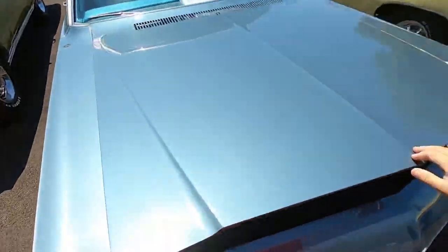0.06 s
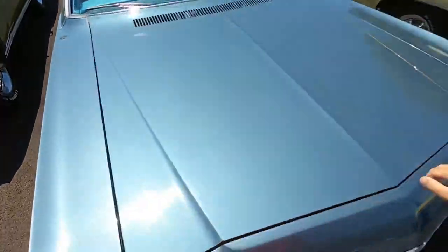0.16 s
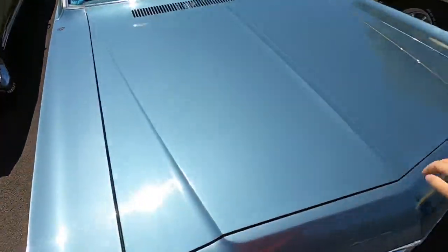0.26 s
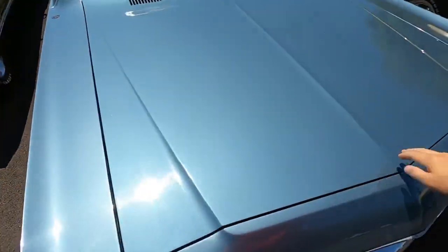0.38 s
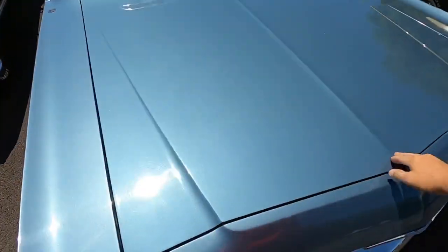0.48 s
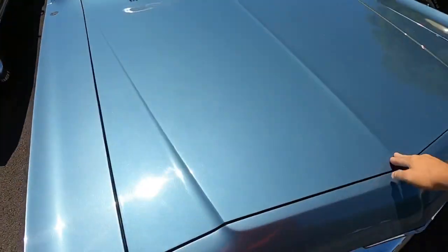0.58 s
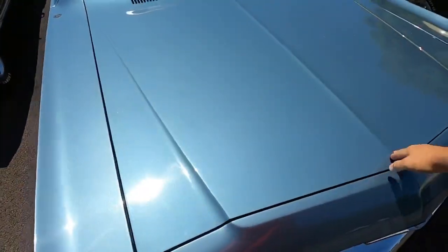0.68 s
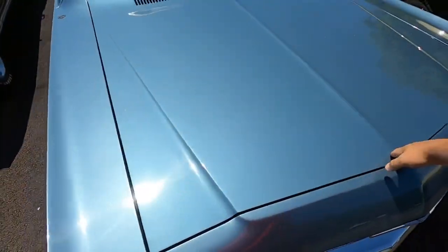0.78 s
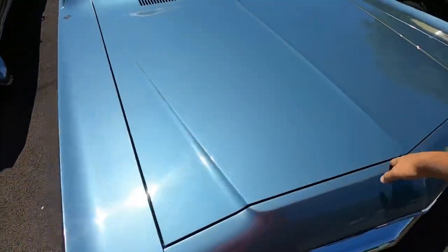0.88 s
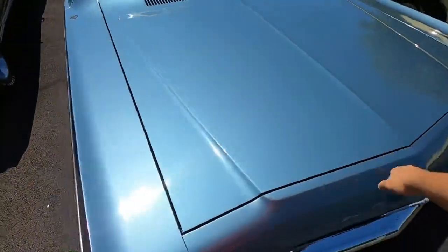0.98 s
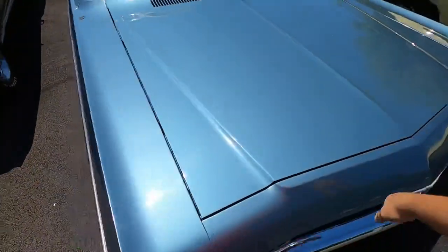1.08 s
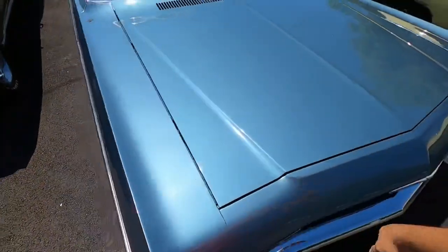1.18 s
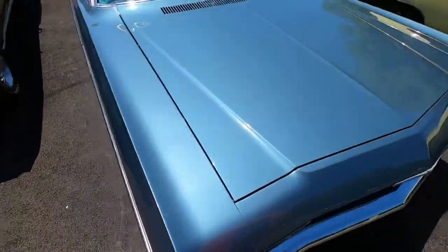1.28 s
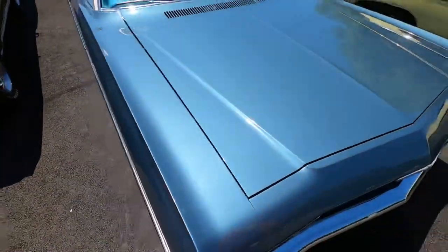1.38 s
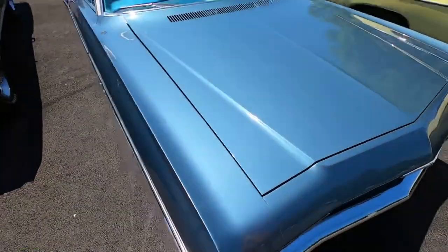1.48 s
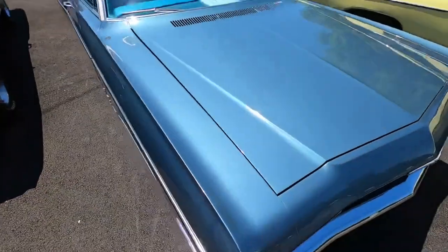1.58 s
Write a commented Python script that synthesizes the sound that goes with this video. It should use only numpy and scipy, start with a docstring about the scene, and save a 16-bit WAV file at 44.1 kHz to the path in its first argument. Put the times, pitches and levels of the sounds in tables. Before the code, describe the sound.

A heavy steel car hood slams shut with one sharp, booming bang outdoors over faint traffic rumble

```python
"""Far traffic, made of banded noise with engine drones, rumbles throughout; two noise puffs of air come first.
At 0.2 s a heavy steel car hood slams outdoors, an arm's length away and a little to the right: within 60 ms
the striker hits the latch, the latch snaps and catches, and the hood lands on its stops. Noise makes the sheet,
decaying sines the panel and latch. A noise zing, the after-ring of body and yard, a dull echo and a tick follow.
One more puff comes at about 0.97 s, and near the end a thin, far squeal from a wavering sine."""
import sys
import numpy as np
from scipy import signal
from scipy.fft import rfft, irfft
from scipy.io import wavfile

SR = 44100
rng = np.random.default_rng(int(sys.argv[2]) if len(sys.argv) > 2 else 0)


def generate_wav(signal):
    """Clip the signal to [-1, 1] and save it as 16-bit WAV at the path in sys.argv[1]."""
    frames = np.transpose(np.atleast_2d(signal))
    scaled = np.clip(frames, -1, 1) * 32767
    pcm = np.round(scaled).astype(np.int16)
    wavfile.write(sys.argv[1], SR, pcm)


N = 70560
T = np.arange(N) / SR
FREQS = np.maximum(np.arange(N // 2 + 1) * SR / N, 1)


def undb(db):
    """Decibels to gain."""
    return 10 ** (np.asarray(db) / 20)


def unit(x):
    """Scale to rms 1."""
    return x / np.sqrt(np.mean(x ** 2))


def at(table, hz, axis=1):
    """Read a column of a table along log frequency."""
    table = np.array(table, float)
    return np.interp(np.log(hz), np.log(table[:, 0]), table[:, axis])


def pan(db):
    """Left and right gains for a left-minus-right level difference; their mean is 1."""
    ratio = undb(np.atleast_1d(db))
    return 2 * np.array([ratio, np.ones_like(ratio)]) / (1 + ratio)


def flat(count):
    """Even spectra with random phases."""
    return np.exp(2j * np.pi * rng.random((count, len(FREQS))))


def stereo_noise(colour, image):
    """Spectrum of a coloured noise, partly shared between the ears."""
    likeness = np.clip(at(image, FREQS, axis=2), 0, 1)
    noise = flat(count=3)
    shared = np.sqrt(likeness) * noise[0]
    separate = np.sqrt(1 - likeness) * noise[1:]
    return (shared + separate) * pan(at(image, FREQS)) * undb(at(colour, FREQS))


def narrow_noise(hz, width_hz):
    """Noise of rms 1 in one steep resonance, as wide as given at half amplitude."""
    resonance = 1 / (1 + ((FREQS - hz) / width_hz * 2) ** 4)
    return unit(irfft(flat(count=1)[0] * resonance, N))


def three_ways(spectrum, low_hz, high_hz):
    """Split a stereo spectrum into bass, middle and treble, the mono sum of each at one level."""
    low, below = (1 / (1 + (FREQS / hz) ** 6) for hz in (low_hz, high_hz))
    bands = [spectrum * weight for weight in (low, below - low, 1 - below)]
    return [band / np.std(irfft(band, N).mean(axis=0)) for band in bands]


def uneven(spacing_hz, spread_db):
    """Random peaks and dips along frequency."""
    grid = np.cumsum(rng.uniform(.5, 1.5, 2048)) * spacing_hz
    return undb(spread_db * np.interp(FREQS, grid, rng.standard_normal(len(grid))))


def strike(start, rise, t60):
    """Envelope: a straight rise, then an exponential fall."""
    age = np.maximum(T - start, 0)
    fall = np.exp(-np.log(1000) * np.maximum(age - rise, 0) / t60)
    return np.minimum(age / rise, 1) * fall


def ring_out(spectrum, start, rise, t60s):
    """Dense modes that start together and die at the pace of their band."""
    place = np.interp(np.log(FREQS), np.log([hz for hz, _ in t60s]), np.arange(len(t60s)))
    ring = 0
    for k, (_, t60) in enumerate(t60s):
        band = np.maximum(1 - abs(place - k), 0)  # neighbouring bands crossfade
        ring = ring + irfft(spectrum * band, N) * strike(start, rise, t60)
    return ring


def modes(table, start, push):
    """Separate decaying sine modes set off by one push."""
    return sum(undb(db) * np.sin(2 * np.pi * hz * (T - start)) * strike(start, push, t60)
               for hz, db, t60 in table)


# contacts of the closing hood: t/s, rise t/s, then level/dB of thump, clang, treble, panel modes, latch ring
CONTACTS = [(0.2018, 0.00031, -18.5, -19, -26.5, -5.5, -2.5), (0.2191, .002, -17.5, -20, -25, -3, -11),
            (0.2430, 0.0027, -12, -27.5, -28.5, -1.5, -8.5), (0.2610, 0.0023, -14.5, -18, -36.5, -4.5, -31)]


def hood():
    """Each contact shakes the sheet steel, the panel modes and the latch."""
    slam, peaks = 0, sheet_peaks()
    for start, rise, thump_db, clang_db, treble_db, panel_db, latch_db in CONTACTS:
        slam = slam + sheet_steel(start, rise, (thump_db, clang_db, treble_db), peaks)
        slam = slam + panel(start, panel_db) + latch(start, latch_db)
    return slam


def sheet_peaks():
    """The sheet's modes bunch into uneven peaks, growing to full height at the top panel mode."""
    peaks = uneven(spacing_hz=70.9, spread_db=2)
    return peaks ** np.minimum(FREQS / PANEL[-1][0], 1)


# colour of the struck sheet, before its bands are levelled: f/Hz, level/dB per Hz
STEEL = [(18, -38), (30, -11), (105, -1), (192, -7), (277, -7), (410, -15), (622, -12), (897, -21.5),
         (1050, -20.5), (2130, -20.5), (2360, -23.5), (3780, -23), (4090, -33), (7650, -41.5),
         (8950, -43.5), (15500, -65.5)]
# ring time of its dense modes: f/Hz, t60/s
STEEL_T60 = [(60, .14), (300, 0.27), (1000, 0.25), (2500, .18), (6000, .16), (13000, 0.11)]
# stereo place of sheet and panel: f/Hz, left-minus-right level/dB, likeness of the ears 0-1
STEEL_IMAGE = [(148, -0.5, 0.92), (390, -1, 0.97), (840, -12.5, 0.69), (2370, -3, 0.63), (4760, -4.5, 0),
               (6430, -11, 0.02), (8750, -16, 0.02), (15000, -28, 0.2)]
THUMP_TOP_HZ, TREBLE_FROM_HZ = 555, 4320


def sheet_steel(start, rise, levels_db, peaks):
    """Struck sheet steel has modes too dense to tell apart: decaying noise in three bands."""
    bands = three_ways(peaks * stereo_noise(STEEL, STEEL_IMAGE), THUMP_TOP_HZ, TREBLE_FROM_HZ)
    sheet = sum(undb(db) * band for db, band in zip(levels_db, bands))
    return ring_out(sheet, start, rise, STEEL_T60)


# boom of the hood panel, mode by mode: f/Hz, relative level/dB, t60/s
PANEL = [(69, 3.5, 0.19), (83, -3.5, 0.17), (112.7, 1, 0.81), (138.2, 5, 0.4), (181.4, 0, 1),
         (256.3, -2.5, 0.54), (292, -5, 0.73), (361.5, -3.5, 0.65), (467.7, -9.5, 0.72),
         (510.5, -7.5, 0.42), (623, -16, 0.61), (670, -19, 0.18), (843, -20.5, 0.66), (1061, -15, 0.51),
         (1172, -21.5, 0.7), (1280, -26.5, 0.77)]
PANEL_DB, PANEL_PUSH_S = -18.5, 0.0041


def panel(start, level_db):
    """The big panel booms in separate sine modes, placed like the sheet."""
    boom = rfft(modes(PANEL, start, PANEL_PUSH_S)) * pan(at(STEEL_IMAGE, FREQS))
    return undb(PANEL_DB + level_db) * irfft(boom, N)


# ring of the latch, mode by mode: f/Hz, relative level/dB, t60/s
LATCH = [(1910, -24, 0.13), (2092, -1.5, 0.087), (2280, 3, 0.023), (2430, -5.5, 0.031), (2653, -4, 0.051),
         (3003, -15, 0.32), (3800, -22, 0.25), (3778, -23, 0.17)]
LATCH_DB, LATCH_PAN_DB, LATCH_PUSH_S = -13.5, -12.5, 0.00037


def latch(start, level_db):
    """The small, stiff latch rings in higher sine modes after a quicker push."""
    return undb(LATCH_DB + level_db) * pan(LATCH_PAN_DB) * modes(LATCH, start, LATCH_PUSH_S)


ZING_S, ZING_HZ, ZING_WIDTH_HZ, ZING_T60_S, ZING_DB, ZING_PAN_DB = .2445, 8900, 600, 0.067, -31.5, -25


def catch_zing():
    """The catch zings as it springs home: a narrow band of decaying noise."""
    zing = narrow_noise(ZING_HZ, ZING_WIDTH_HZ) * strike(ZING_S, 0.001, ZING_T60_S)
    return undb(ZING_DB) * pan(ZING_PAN_DB) * zing


TICK_S, TICK_HZ, TICK_WIDTH_HZ, TICK_T60_S, TICK_DB, TICK_PAN_DB = 0.465, 7570, 3500, 0.15, -56, -18


def echo_tick():
    """A faint high tick, perhaps the latch catch coming back off a wall: a band of decaying noise."""
    tick = narrow_noise(TICK_HZ, TICK_WIDTH_HZ) * strike(TICK_S, 0.0018, TICK_T60_S)
    return undb(TICK_DB) * pan(TICK_PAN_DB) * tick


# colour of the after-ring, before it is levelled: f/Hz, level/dB per Hz
TAIL = [(18, -38), (30, -9), (171, -3), (328, -8), (364, -8.5), (485, -9), (524, -15.5), (645, -14.5),
        (735, -18), (3320, -30), (4780, -42), (9390, -48.5), (15000, -73)]
# its ring time: f/Hz, t60/s
TAIL_T60 = [(60, 0.86), (200, 0.7), (500, 0.5), (1500, 0.44), (4000, 0.52), (10000, 0.5)]
# its stereo place: f/Hz, left-minus-right level/dB, likeness of the ears 0-1
TAIL_IMAGE = [(149, 0.5, 1), (387, -2.5, 0.92), (780, -3, 0.32), (2320, -6, 0.41), (4540, 0, 0.087),
              (6500, -11, 0.038), (8550, -18, 0.046), (15100, -22, .05)]
TAIL_S, TAIL_RISE_S, TAIL_DB = 0.25, 0.062, -17
TAIL_FLUTTER_PER_S, TAIL_FLUTTER_DB = 50, 1


def after_ring():
    """Car body and yard reflections swell and die away, fluttering as reflections arrive in clumps."""
    spectrum = stereo_noise(TAIL, TAIL_IMAGE)
    spectrum = spectrum / np.std(irfft(spectrum, N))
    flutter_db = TAIL_FLUTTER_DB * narrow_noise(TAIL_FLUTTER_PER_S, TAIL_FLUTTER_PER_S)
    return undb(TAIL_DB + flutter_db) * ring_out(spectrum, TAIL_S, TAIL_RISE_S, TAIL_T60)


ECHO_S, ECHO_DB, ECHO_TOP_HZ = .18, -21, 3930


def echo(slam):
    """A building across the yard sends the slam back late, dull and faint, with the sides swapped."""
    delay = np.exp(-2j * np.pi * FREQS * ECHO_S)
    dulling = 1 / (1 + (FREQS / ECHO_TOP_HZ) ** 4)
    return undb(ECHO_DB) * irfft(rfft(slam[::-1]) * delay * dulling, N)


# puffs of air on the microphone: centre t/s, spread t/s, level/dB, left-minus-right level/dB
PUFFS = [(0.046, 0.068, -33.5, -2), (0.148, 0.03, -32, -16), (0.969, 0.04, -37, -9)]
PUFF_HZ, PUFF_WIDTH_HZ = 60.3, 55


def puffs():
    """Moving air buffets each microphone port on its own: low noise in bell-shaped swells."""
    air = 0
    for centre, spread, db, side_db in PUFFS:
        swell = np.exp(-.5 * ((T - centre) / spread) ** 2)
        ports = np.array([narrow_noise(PUFF_HZ, PUFF_WIDTH_HZ) for _ in range(2)])
        air = air + undb(db) * pan(side_db) * swell * ports
    return air


# a thin far squeal, perhaps a brake: t/s, level/dB
SQUEAL_LEVEL = [(1.33, -100), (1.4, -76), (1.45, -85), (1.52, -87), (1.564, -66), (1.6, -88)]
SQUEAL_HZ, SQUEAL_WAVER_HZ, SQUEAL_WAVER_PER_S = 7480, 24, 25


def squeal():
    """A faint high sine far away whose pitch wavers at random."""
    waver = SQUEAL_WAVER_HZ * narrow_noise(SQUEAL_WAVER_PER_S, 2 * SQUEAL_WAVER_PER_S)
    tone = np.sin(2 * np.pi * np.cumsum(SQUEAL_HZ + waver) / SR)
    times, level_db = np.array(SQUEAL_LEVEL).T
    return unit(tone) * undb(np.interp(T, times, level_db))


# colour of the traffic, before its bands are levelled: f/Hz, level/dB per Hz
TRAFFIC = [(15, -45), (30, -7.5), (50, -6), (85, -1.5), (110, -7), (170, -10), (250, -14.5), (350, -16.5),
           (550, -10.5), (800, -15.5), (1200, -18.5), (2000, -25), (3100, -32.5), (4700, -47),
           (7000, -55.5), (9300, -57.5), (10500, -66), (13000, -74), (15500, -89)]
# its stereo place: f/Hz, left-minus-right level/dB, likeness of the ears 0-1
TRAFFIC_IMAGE = [(35, 3, 1), (100, -1.5, 0.71), (312, -1, 1), (700, -1.5, 0.43), (2230, -1.5, 0.31),
                 (5300, -0.5, 0.21), (9200, -18.5, 0.026), (15000, -12, .05)]
# its level, louder around the slam, then lower, creeping back up: t/s, level/dB of rumble, road noise, hiss
TRAFFIC_LEVEL = [(0, -33, -44.5, -72), (.19, -29.5, -43.5, -63), (.3, -27.5, -40, -56),
                 (.65, -40.5, -52.5, -72.5), (.78, -40.5, -51, -71.5), (1.102, -41.5, -50.5, -69),
                 (1.18, -40, -48.5, -74), (1.4, -41.5, -46.5, -72), (1.6, -36.5, -44.5, -72)]
# drone of far engines: f/Hz, width f/Hz, level/dB relative to the rumble
DRONE = [(87.2, 5, -5.5), (140, 7.1, -6.5), (191.1, 16, -9)]
RUMBLE_TOP_HZ, HISS_FROM_HZ = 372, 4340


def traffic():
    """Low rumble with droning engines, road noise and a thin hiss, each following its own level."""
    bands = three_ways(stereo_noise(TRAFFIC, TRAFFIC_IMAGE), RUMBLE_TOP_HZ, HISS_FROM_HZ)
    rumble, road, hiss = (irfft(band, N) for band in bands)
    drone = sum(undb(db) * narrow_noise(hz, width) for hz, width, db in DRONE)
    rumble = unit(rumble + drone)
    times, *levels = np.array(TRAFFIC_LEVEL).T
    return sum(layer * undb(np.interp(T, times, db)) for layer, db in zip((rumble, road, hiss), levels))


def scene():
    """The slam, its ring and its echo over puffs, squeal and traffic."""
    slam = hood()
    details = catch_zing() + echo_tick()
    return slam + details + after_ring() + echo(slam) + puffs() + squeal() + traffic()


TOP_HZ = 15650


def record(dry):
    """The recorder rounds the highest peaks and cuts the top."""
    rounded = dry / (1 + dry ** 4) ** .25
    top_cut = signal.ellip(10, .2, 80, TOP_HZ, fs=SR, output="sos")
    return signal.sosfilt(top_cut, rounded)


dry = scene()
out = record(dry)
generate_wav(out)
```